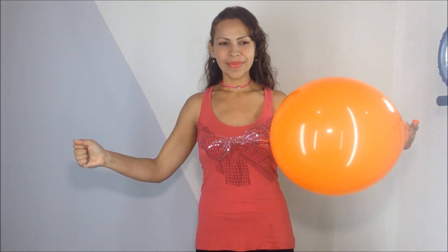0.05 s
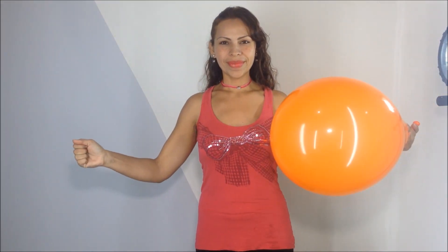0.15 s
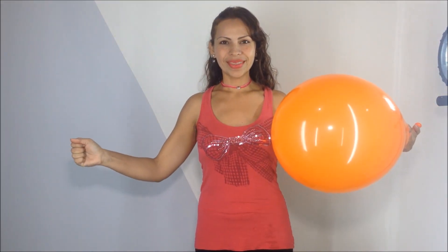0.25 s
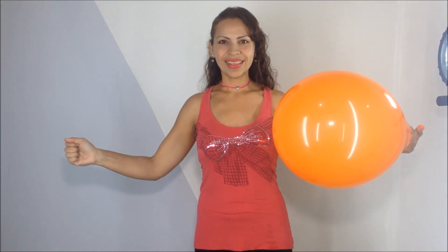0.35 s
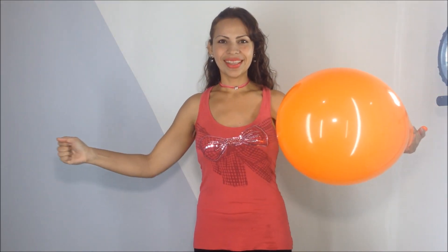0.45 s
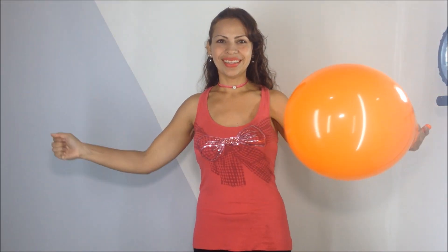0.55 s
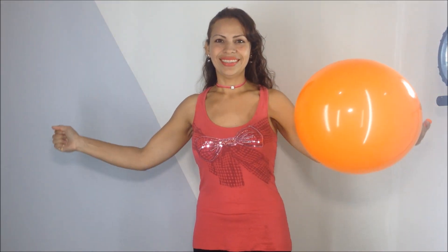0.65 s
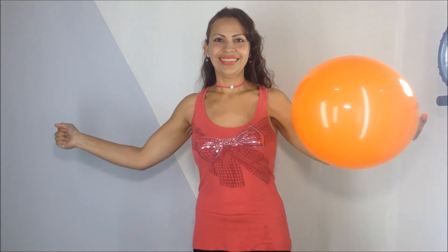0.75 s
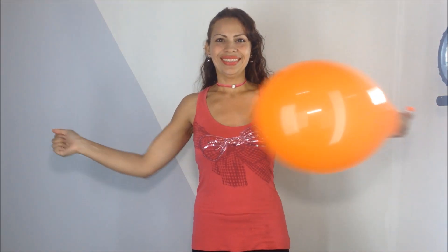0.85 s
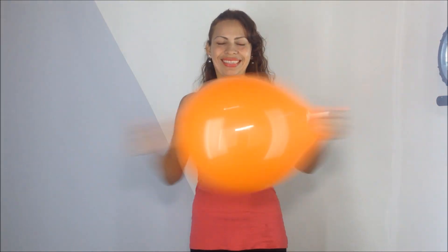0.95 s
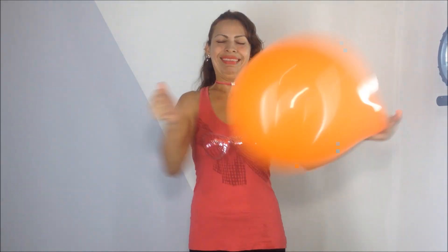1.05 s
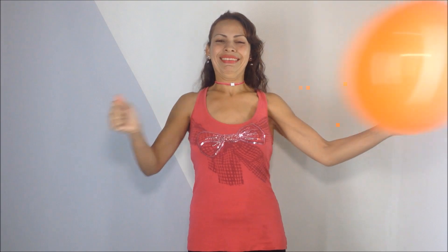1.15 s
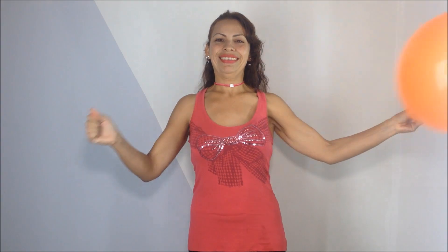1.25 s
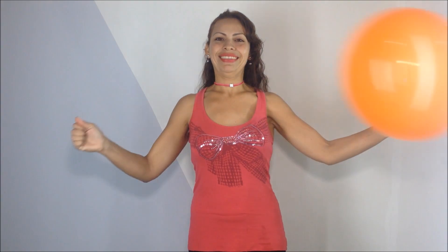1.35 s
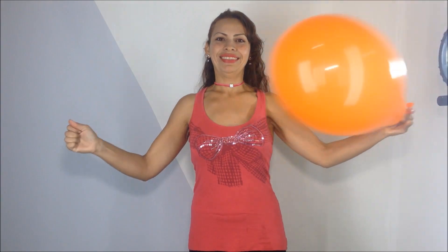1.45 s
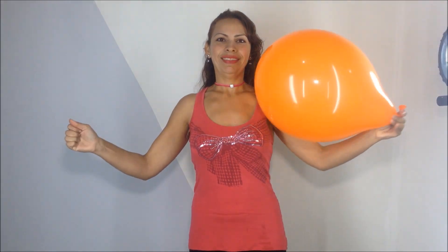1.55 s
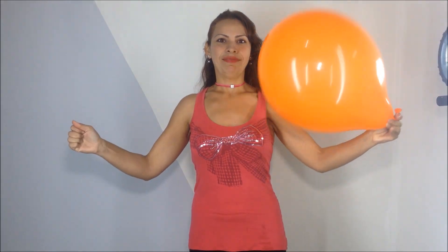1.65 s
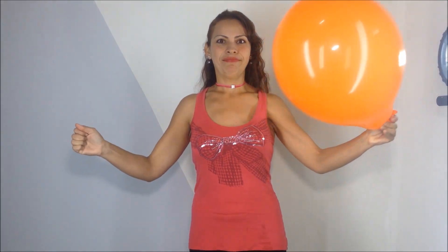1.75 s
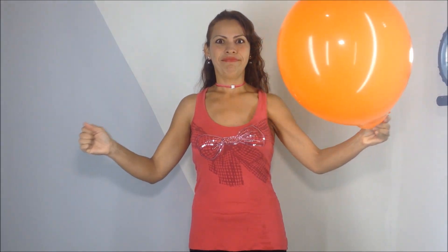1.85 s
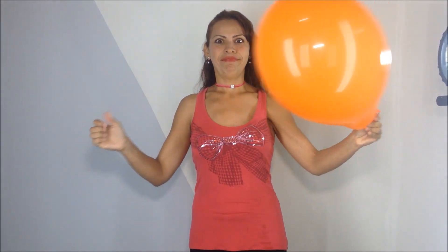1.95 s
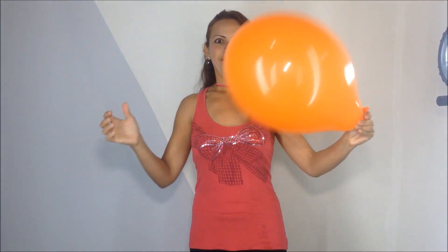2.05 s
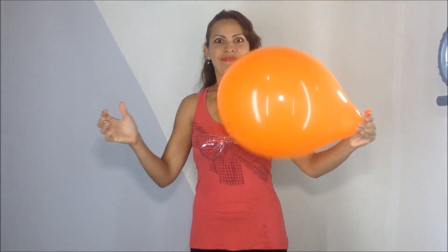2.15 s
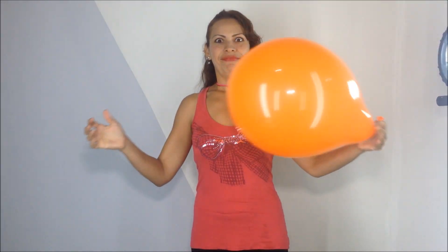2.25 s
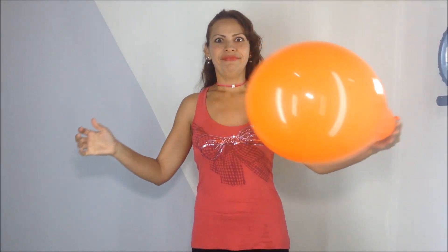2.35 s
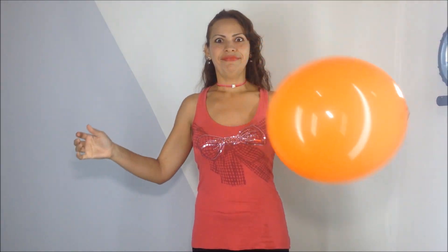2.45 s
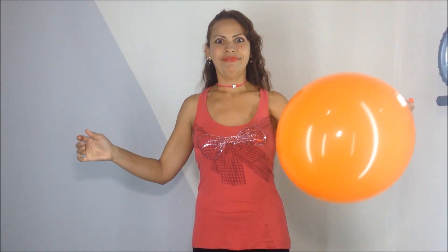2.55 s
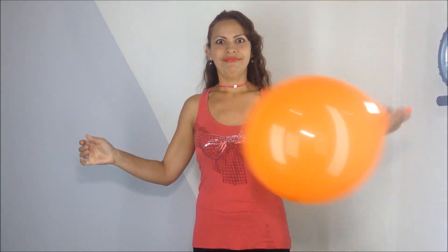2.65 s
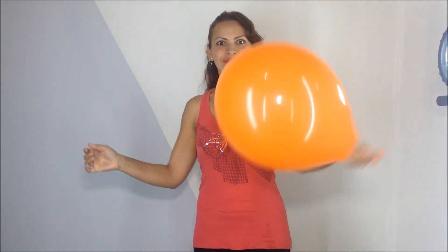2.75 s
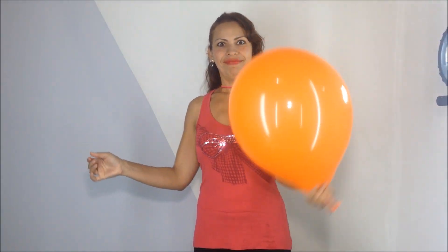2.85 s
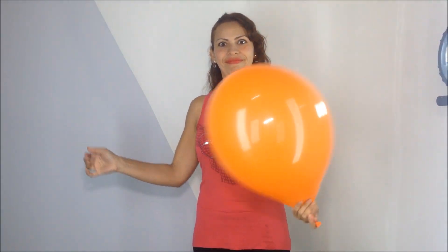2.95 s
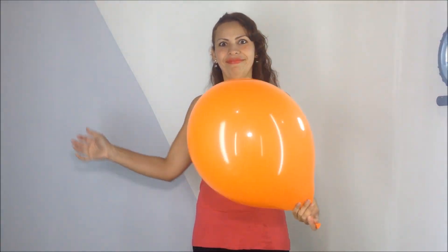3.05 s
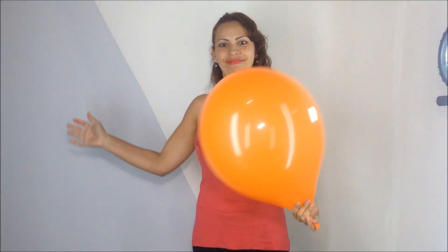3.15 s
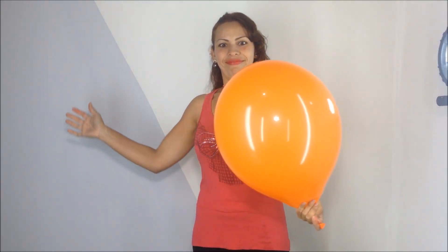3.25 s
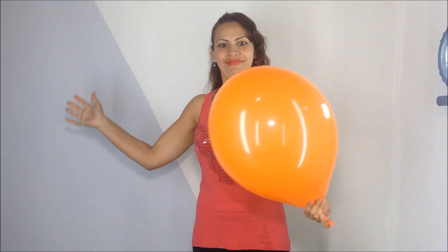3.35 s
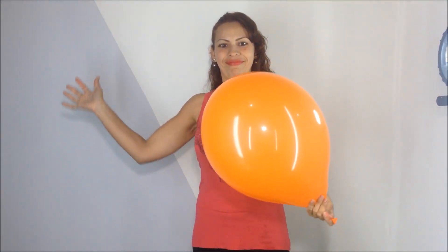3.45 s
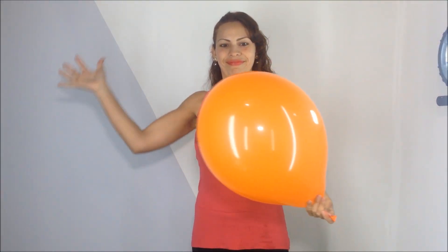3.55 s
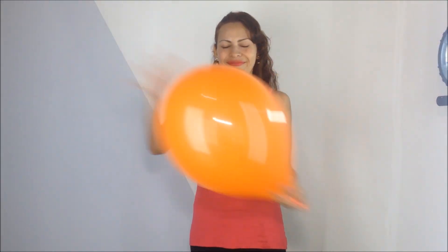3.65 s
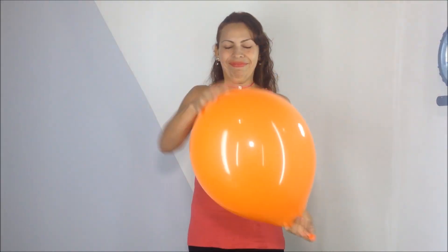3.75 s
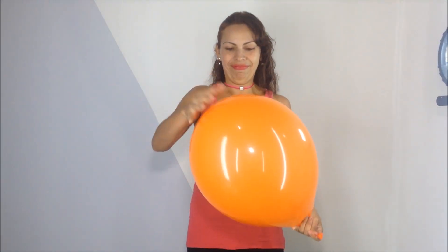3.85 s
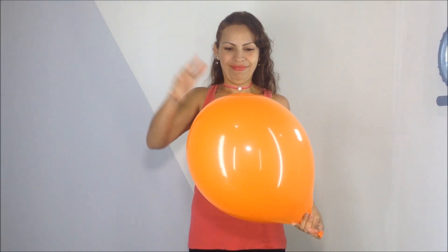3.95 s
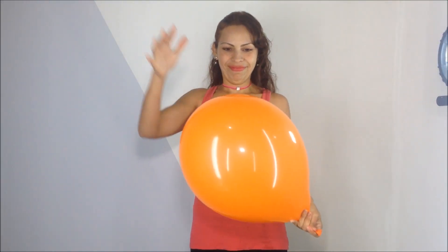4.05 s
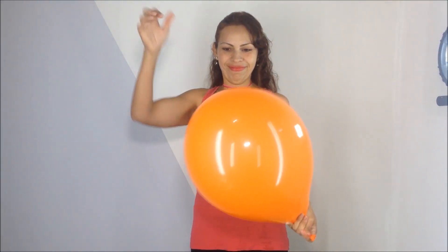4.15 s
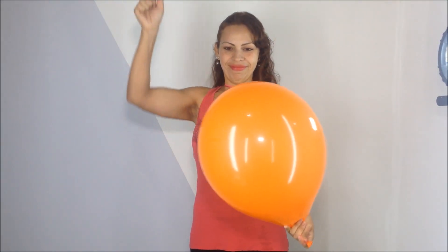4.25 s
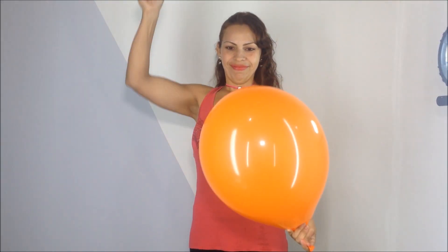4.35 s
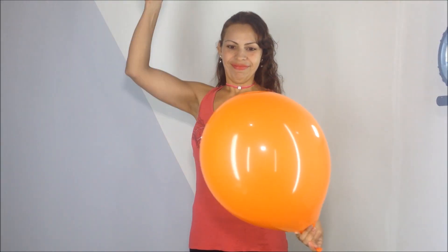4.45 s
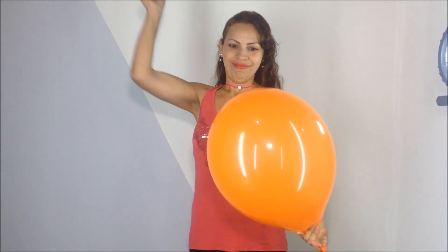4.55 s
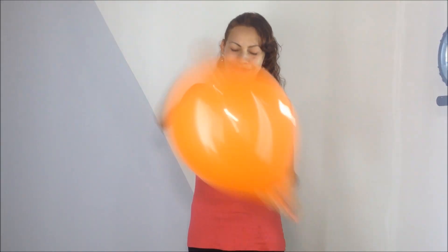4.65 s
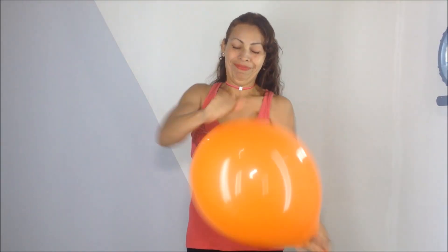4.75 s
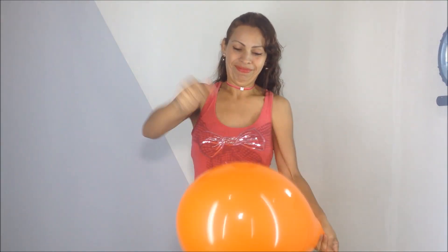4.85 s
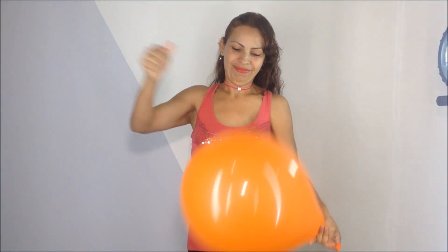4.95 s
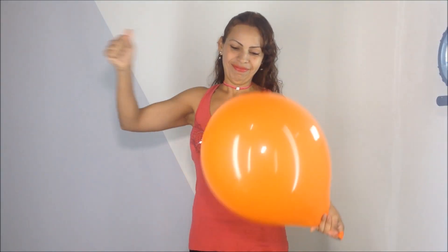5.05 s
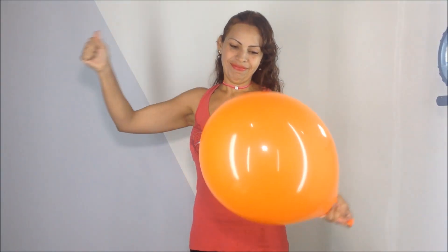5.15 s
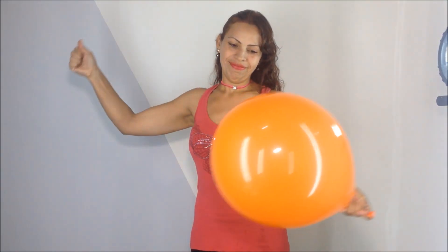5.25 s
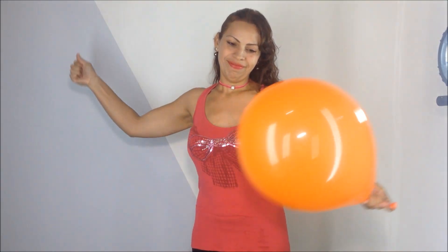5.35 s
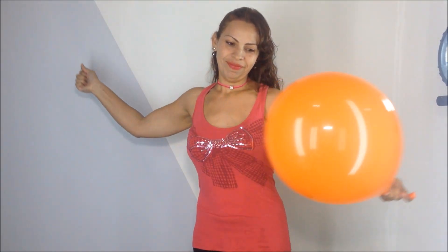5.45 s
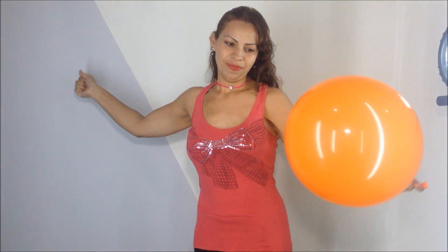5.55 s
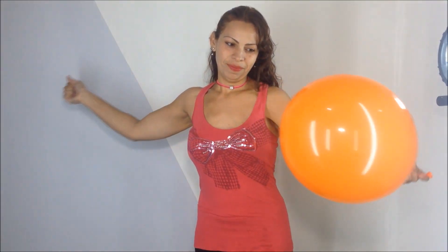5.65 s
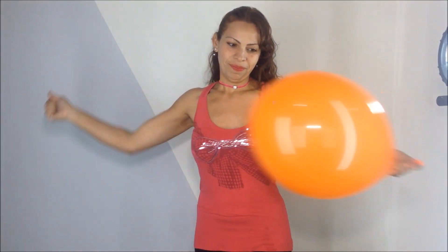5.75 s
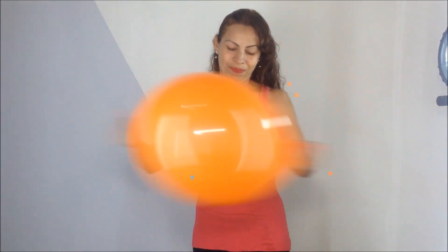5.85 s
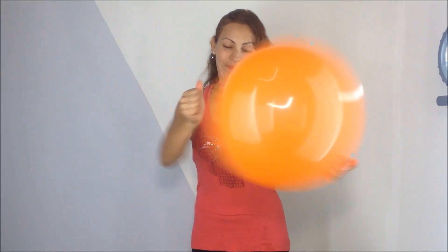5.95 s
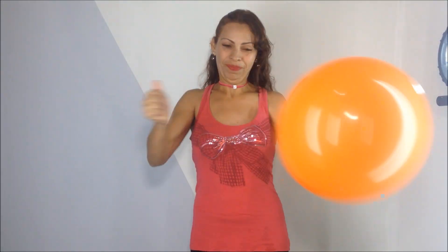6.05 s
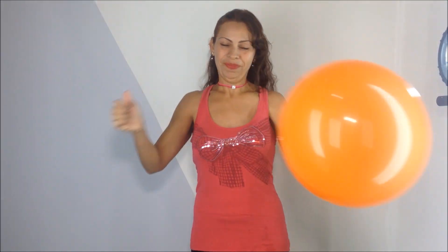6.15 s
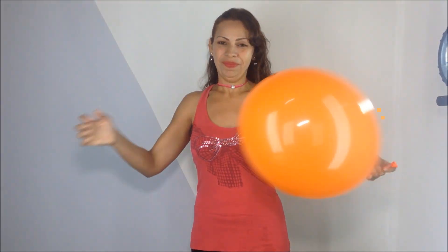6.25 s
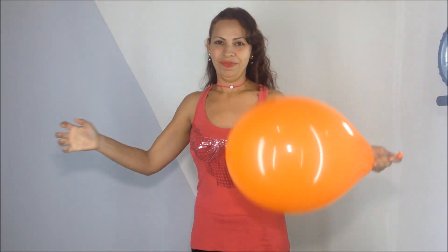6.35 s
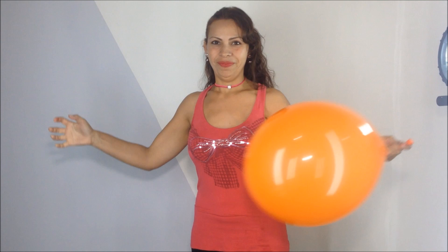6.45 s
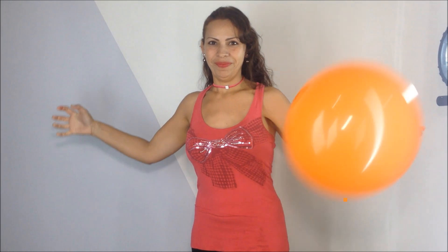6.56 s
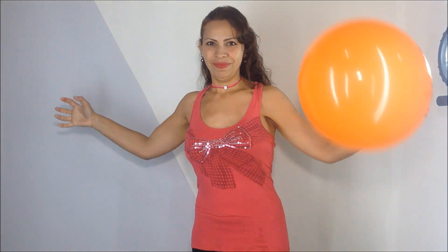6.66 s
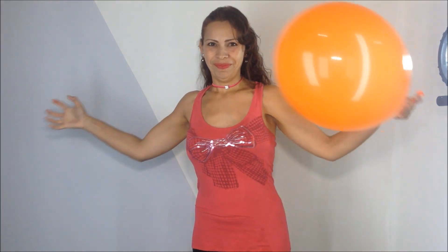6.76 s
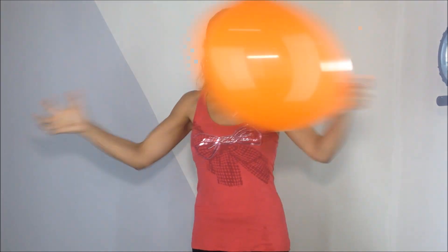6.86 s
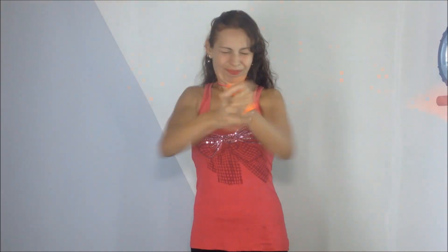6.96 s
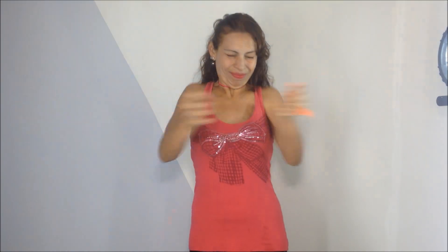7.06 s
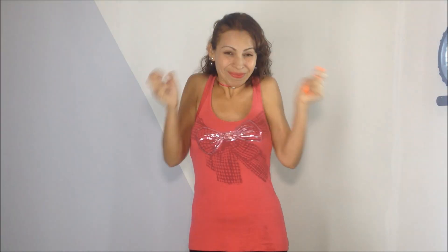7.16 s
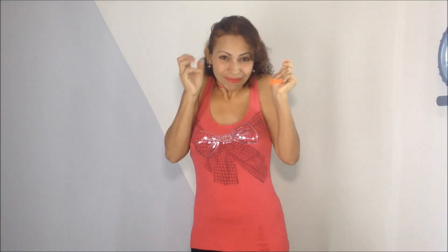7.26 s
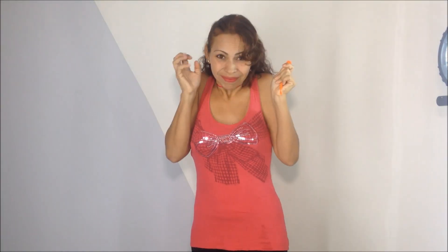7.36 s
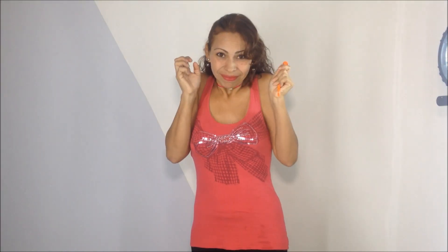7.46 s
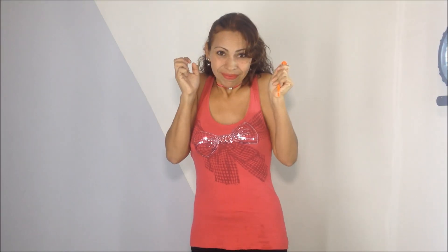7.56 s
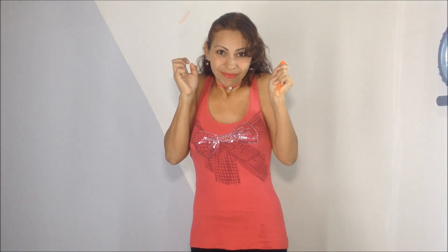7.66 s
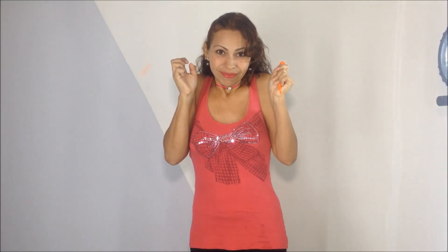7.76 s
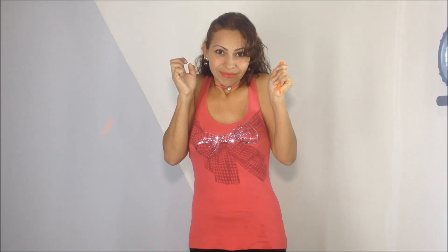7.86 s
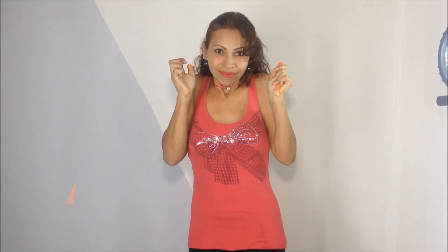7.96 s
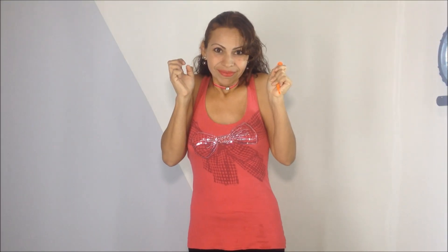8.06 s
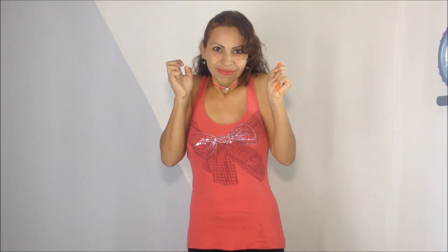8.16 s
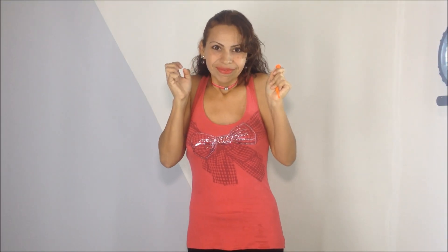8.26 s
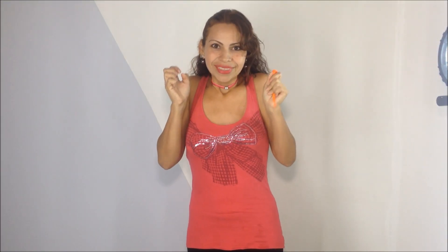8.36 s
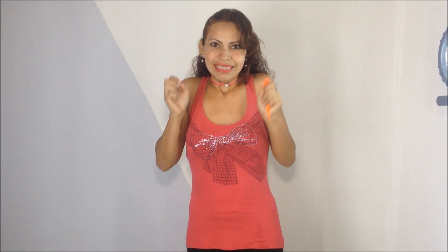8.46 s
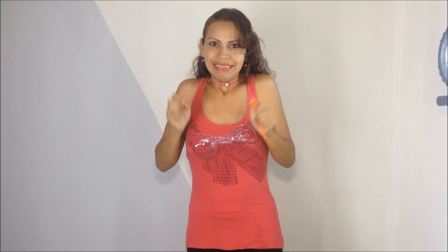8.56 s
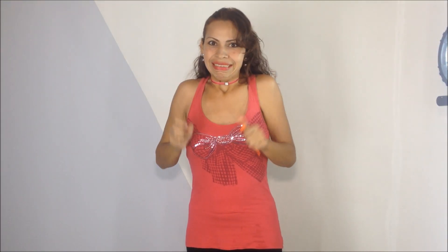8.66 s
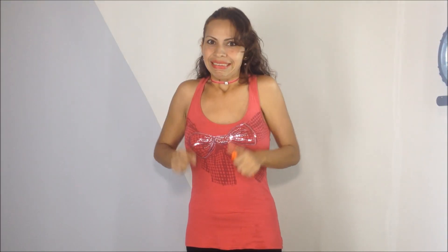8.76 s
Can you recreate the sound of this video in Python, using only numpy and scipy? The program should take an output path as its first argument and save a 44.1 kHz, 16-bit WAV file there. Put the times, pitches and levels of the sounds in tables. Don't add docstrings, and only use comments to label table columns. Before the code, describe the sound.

Faint street rumble and hiss, then a booming balloon punch echoing off bare walls. Soft strokes and ticks on taut latex follow over a distant engine. Two harder punches come about a second apart, then a softer swelling one with a loud flick. Moments later the balloon explodes, bright and crackling at first, then boomy, overloading the mono microphone. The reverberation dies away to subdued hush, light brushing and a thin high whine.

```python
import sys
import numpy as np
from scipy import signal
from scipy.fft import rfft, irfft, next_fast_len
from scipy.io import wavfile
from scipy.ndimage import uniform_filter1d

SR = 44100
rng = np.random.default_rng(int(sys.argv[2]) if len(sys.argv) > 2 else 0)


def unload_audio(sound):
    columns = np.transpose(np.atleast_2d(sound))
    steps = np.round(np.clip(columns, -1, 1) * 32767)
    wavfile.write(sys.argv[1], SR, steps.astype(np.int16))


def invert_db(level):
    return 10 ** (np.asarray(level, dtype=float) / 20)


N = 388942


def unit(x):
    return x / np.sqrt(np.mean(x ** 2) + 1e-20)


def at_hz(points, hz):
    table = np.array(points)
    return np.interp(np.log(hz), np.log(table[:, 0]), table[:, 1])


def highpass(x, order, cutoff_hz):
    return signal.sosfilt(signal.butter(order, cutoff_hz, "high", fs=SR, output="sos"), x)


def drift(rate):
    hop = 40
    pole = np.exp(-2 * np.pi * rate * hop / SR)
    noise = rng.standard_normal(N // hop + 2002)
    slow = signal.lfilter([1], [1, -2 * pole, pole * pole], noise)[2000:]
    return np.interp(np.arange(N) / hop, np.arange(len(slow)), unit(slow))


def bands(pair):
    edges_hz = 25 * 2 ** np.arange(0, 9.7, 1 / 3)
    for k, (low, high) in enumerate(zip(edges_hz, edges_hz[1:])):
        band_filter = signal.butter(2, [low, high], "band", fs=SR, output="sos")
        yield np.sqrt(low * high), signal.sosfilt(band_filter, pair[k % 2])


def add(out, start_s, x):
    i = round(start_s * SR)
    out[i:i + len(x)] += x[:N - i]


# pitch_hz [Hz], t60_s [s]
ROOM_DECAY = [(40, 0.26), (75, .7), (120, 1.29), (250, 1.165), (600, 0.84), (1500, 0.73), (2800, 0.77),
              (4500, 0.69), (8000, 0.58), (15000, .42)]


def echoes(colour, tilt_db, swell_s, lag=0.33, depth=0.67, order=1, damping=0.92, density=1200, length_s=1.6):
    run_in = SR // 20
    t = np.arange(-run_in, round(length_s * SR)) / SR
    share = np.clip((density + 1e5 * np.maximum(t, 0)) / SR, 0, 1)
    lands = rng.random((2, len(t))) < share
    clicks = rng.standard_normal((2, len(t))) * lands / np.sqrt(share)
    clicks[:, run_in] = 1.5 / np.sqrt(share[0])
    t, out = t[run_in:], 0
    for hz, band in bands(clicks):
        rise = 1 - min(depth, 1) * np.exp(-t / (abs(swell_s) * (500 / hz) ** lag))
        rise = rise ** order
        beat_db = 1.574 * np.sin(2 * np.pi * (rng.uniform(8, 30) * t + rng.random()))
        decay_db = 60 * t / at_hz(ROOM_DECAY, hz) / damping
        level_db = at_hz(colour, hz) + tilt_db * np.log2(hz / 1000) + beat_db - decay_db
        out = out + band[run_in:] * rise * invert_db(level_db)
    out = out * np.minimum(t / .0004, 1)
    return out / np.sqrt(np.mean(out[:SR // 10] ** 2))


def ringing(modes, swell_s, length_s=1.6):
    t, out = np.arange(round(length_s * SR)) / SR, 0
    for hz, level_db, t60_s in modes:
        beat = 1 + 0.44 * np.sin(2 * np.pi * (rng.uniform(3.7, 14) * t + rng.random()))
        tone = np.sin(2 * np.pi * (hz * t + rng.random()))
        out = out + invert_db(level_db - 60 * t / t60_s) * beat * tone
    return out * (1 - np.exp(-t / abs(swell_s)))


# start_s [s], level_db [dB], tilt_db [dB per octave], swell_s [s], push_db [dB]
BLOWS = [
    (1.105, -17.5, 0.4, 0.016, -32),
    (3.815, -15, 0.58, 0.01, -26.5),
    (4.8037, -15.5, 0.7, 0.023, -28.5),
    (6.008, -17.5, 0.5, 0.044, -41),
]
# pitch_hz [Hz], level_db [dB], t60_s [s]
GRIPS = [
    [(146.8, -6, 0.97), (205, -1, 1), (337, -8, 0.77), (415, -0.5, 0.27), (641, -5, 0.28),
     (683, -6.5, 0.61), (818, -27, 0.86)],
    [(136.2, -12.5, 1.6), (226, -26, 2.6), (314, -7, 0.39), (433, -15, 1.23), (508, -3, 0.5),
     (556, -9.5, 0.77), (728, -5.5, 0.48)],
    [(165.5, 0, 0.54), (217.5, -1.5, 0.58), (326.5, 1.5, 0.43), (465, -29, 0.4), (515, 1, 0.47),
     (686, -8, 0.41), (771, -1, 0.4)],
    [(208, 2, 0.3), (250, -20, 1.4), (335, 13, 0.28), (614, -32, 0.51), (710, -27, 0.6), (850, -33, 0.5)],
]
# pitch_hz [Hz], level_db [dB per Hz]
BLOW_COLOUR = [(30, -26), (53, -14), (85, -18.5), (211, 1.5), (267, -7), (320, -3), (448, -8), (497, -1.5),
               (597, -12.5), (754, -10), (1110, -10), (2100, -18), (15000, -45)]
BODY_DAMPING = [1.1, 0.84, 0.86, 0.79]
TOUCH_AHEAD = [.004, .004, .0005, .0005]


def blows():
    out = np.zeros(N)
    for blow, ahead_s, modes, damping in zip(BLOWS, TOUCH_AHEAD, GRIPS, BODY_DAMPING):
        start_s, level_db, tilt_db, swell_s, push_db = blow
        touch = echoes(BLOW_COLOUR, tilt_db + 2.0, swell_s, depth=0.27, length_s=.3)
        add(out, start_s - ahead_s, invert_db(level_db - 15) * touch)
        hit = echoes(BLOW_COLOUR, tilt_db, swell_s, damping=damping)
        add(out, start_s, invert_db(level_db) * highpass(hit, 2, 95))
        add(out, start_s, invert_db(level_db + 2) * ringing(modes, swell_s))
        push_modes = [(58.4, push_db, 0.87 * damping), (38, push_db - 17.5, .9), (78, push_db - 3, .7)]
        add(out, start_s, ringing(push_modes, 0.018))
    return out


# delay_s [s], peak_db [dB over the blow], width_ms [ms]
SLAPS = [
    (.049, 10.5, 2.5),
    (.018, 9, .9),
    (.035, 12, 1.3),
    (.042, 8.5, 2.2),
]


def fronts():
    out = np.zeros(N)
    for (start_s, level_db, *_), (delay_s, slap_db, slap_ms) in zip(BLOWS, SLAPS):
        direct = (start_s, 5, .6)
        slap = (start_s + delay_s, slap_db, slap_ms)
        for front_s, peak_db, width_ms in [direct, slap]:
            n = round(width_ms * SR / 1000)
            hump = np.sin(np.pi * np.arange(n) / n)
            rebound = np.sin(np.pi * np.arange(2 * n) / n / 2)
            add(out, front_s, invert_db(level_db + peak_db) * np.concatenate([hump, -rebound / 2]))
    return highpass(out + 1e-18, 3, 140)


# start_s [s], level_db [dB], tilt_db [dB per octave], swell_s [s]
DENT = (7.061, -16, 1.0, .003)
# start_s [s], level_db [dB], tilt_db [dB per octave], swell_s [s]
CRACK = (7.0685, 2.7, 3.02, 0.0032)
# start_s [s], level_db [dB], tilt_db [dB per octave], swell_s [s]
BURST = (7.0685, -4.5, 0.5, 0.0644)
# pitch_hz [Hz], level_db [dB per Hz]
BURST_COLOUR = [(18, -78.5), (30, -47), (75, -38), (171, -6.5), (337, -5.5), (394, -5.5), (472, -7),
                (538, -8), (1480, -20), (4540, -19), (5170, -20), (6700, -22), (15000, -33.5)]
# pitch_hz [Hz], level_db [dB], t60_s [s]
BURST_MODES = [(150.2, -9, 1.19), (183.2, -5, 1.4), (295, -5, 0.71), (382.6, -4.5, 1.37), (543, -7, 1.37),
               (708, -11.5, 0.9), (837, -9.5, 0.71), (831, -6, 0.31)]


def burst():
    out, burst_s = np.zeros(N), BURST[0]
    dent = echoes(BLOW_COLOUR, *DENT[2:], length_s=0.32)
    add(out, DENT[0], invert_db(DENT[1]) * dent)
    crack = echoes(BURST_COLOUR, *CRACK[2:], damping=.45, density=10000, length_s=.6)
    add(out, CRACK[0], invert_db(CRACK[1]) * crack)
    boom = echoes(BURST_COLOUR, *BURST[2:], lag=1.0, depth=0.87, order=2, damping=1.084,
                  density=9000, length_s=1.75)
    add(out, burst_s, invert_db(BURST[1]) * boom)
    out = highpass(out, 4, 128)
    add(out, burst_s + .05, invert_db(-12.0) * ringing(BURST_MODES, 0.11, length_s=1.8))
    lows = signal.sosfilt(signal.butter(1, 600, fs=SR, output="sos"), out)
    release_s, fade_s = .09, .015
    held = .5 - .5 * np.tanh((np.arange(N) / SR - burst_s - release_s) / fade_s)
    out = out - (1 - invert_db(-5)) * held * lows
    add(out, burst_s, ringing([(PUSH_HZ, -23, .2), (34, -27, .2)], .005))
    return out


PUSH_HZ = 58.4

# start_s [s], level_db [dB], tilt_db [dB per octave], swell_s [s]
FLICKS = [
    (1.385, -45.5, 1.5, .01),
    (2.297, -57, 3.5, 0.0041),
    (2.44, -59.5, 7, .01),
    (2.891, -56, 2.5, .004),
    (5.982, -47, 1, 0.0027),
    (6.053, -31, 3.5, 0.0023),
    (6.329, -57, 3.5, .003),
    (8.54, -63, 8, 0.032),
    (8.68, -60, 5, 0.038),
]
# pitch_hz [Hz], level_db [dB per Hz]
FLICK_COLOUR = [(300, -20), (900, -5), (1300, 1.5), (2500, -3.5), (3000, -9), (6000, -16.5), (15000, -31)]
# start_s [s], level_db [dB], tilt_db [dB per octave], swell_s [s]
NAILS = [
    (6.446, -42, -2.5, 0.0021),
    (6.97, -36.5, -0.6, .006),
]
# pitch_hz [Hz], level_db [dB per Hz]
NAIL_COLOUR = [(500, -23), (1100, -8), (1400, -3), (1800, -4), (2500, -2), (3000, -14), (5000, -20.5),
               (15000, -34.5)]
# peak_s [s], peak_db [dB], rise_s [s per 20 dB]
RUBS = [
    (1.9, -53.5, .07),
    (2.39, -43, 0.08),
    (2.696, -51, -0.08),
    (8.57, -64, 0.4),
]


def fingers():
    out, level, t = np.zeros(N), np.zeros(N), np.arange(N) / SR
    for start_s, level_db, tilt_db, swell_s in FLICKS:
        add(out, start_s, invert_db(level_db) * echoes(FLICK_COLOUR, tilt_db, swell_s, length_s=0.55))
    for start_s, level_db, tilt_db, swell_s in NAILS:
        nail = echoes(NAIL_COLOUR, tilt_db, swell_s, depth=0.44, density=500, length_s=0.48)
        add(out, start_s, invert_db(level_db) * nail)
    for peak_s, peak_db, rise_s in RUBS:
        fall_s = rise_s * 2.25
        level += invert_db(peak_db - 20 * np.maximum((peak_s - t) / rise_s, (t - peak_s) / fall_s))
    sizes = invert_db(3.2 * np.minimum(rng.exponential(1, (2, N)), 5))
    signs = rng.choice([-1, 1], (2, N))
    slips = sizes * signs * (rng.random((2, N)) < 4000 / SR)
    rub = 0
    for hz, band in bands(slips):
        if hz > 300:
            rub = rub + band * invert_db(at_hz(FLICK_COLOUR, hz) - 2.0 * np.log2(hz / 1000))
    return out + level * unit(rub)


# time_s [s], firing_hz [Hz], second_order_db [dB]
ENGINE = [
    [(1.55, 76.4, -55), (1.68, 80.7, -42.5), (1.92, 80.8, -49.5), (2.1, 87.5, -42.5), (2.45, 93, -46.5),
     (2.8, 94.1, -45), (3.0, 87, -46), (3.09, 75.9, -45), (3.3, 72, -55)],
    [(5.1, 77.3, -44), (5.3, 76.8, -40), (5.6, 78.1, -42.5), (6.7, 80, -45), (7.0, 79.8, -54)],
]
# third_db [dB over second], third_change_db [dB per s], fifth_db [dB over second]
UPPER_ORDERS = [
    (5, -17, -18),
    (-14, 0, -14),
]


def engine():
    out = np.zeros(N)
    for rows, (third_db, change_db, fifth_db) in zip(ENGINE, UPPER_ORDERS):
        time_s, firing_hz, level_db = np.transpose(rows)
        t = np.arange(round(time_s[0] * SR), round(time_s[-1] * SR)) / SR
        hz = np.interp(t, time_s, firing_hz) * (1 + .004 * drift(6)[:len(t)])
        phase = 2 * np.pi * np.cumsum(hz) / SR
        tone = np.sin(2 * phase)
        tone = tone + invert_db(third_db + change_db * (t - time_s[0])) * np.sin(3 * phase)
        tone = tone + invert_db(fifth_db) * np.sin(5 * phase)
        level = np.sqrt(2) * invert_db(np.interp(t, time_s, level_db))
        add(out, time_s[0], level * tone * signal.windows.tukey(len(t), .1))
    return out * invert_db(1 + 1.5 * drift(9))


# pitch_hz [Hz], level_db [dB per Hz]
STREET = [(15, -72), (25, -48.5), (49, -23), (86, -39), (98, -25), (121, -1.5), (243, -1.5), (278, -2),
          (363, -6.5), (404, -6.5), (637, -8), (879, -13), (978, -17), (4750, -31), (15000, -47.5)]


def street():
    together, noise = drift(0.55), 0
    for hz, band in bands(rng.standard_normal((2, N))):
        noise = noise + band * invert_db(at_hz(STREET, hz) + .7 * together + 1.2 * drift(4.2))
    since_s = np.arange(N) / SR - BURST[0]
    duck_db = np.minimum(-5 + 2.5 * np.maximum(since_s - 1, 0), 0) * (since_s > 0)
    return unit(noise) * invert_db(-44.5 + duck_db)


# start_s [s], pitch_hz [Hz], level_db [dB]
WHINE = (8.62, 7806, -74)


def whine():
    start_s, hz, level_db = WHINE
    t = np.arange(N) / SR
    fade_in = np.clip((t - start_s) / .08, 0, 1)
    return invert_db(level_db + 2.5 * drift(15)) * fade_in * np.sin(2 * np.pi * hz * t)


# pitch_hz [Hz], width_hz [Hz], lift_db [dB]
STANDING = [(199, 11, 2.5), (278, 12, 3), (399, 12, 5), (507, 10, 0), (657, 36, 5), (777, 12, 1.5),
            (860, 44, 3), (1168, 47, 3.5), (1377, 45, 2.5)]


def standing(x):
    size = next_fast_len(N)
    hz = np.fft.rfftfreq(size, 1 / SR)
    lift = 1
    for centre_hz, width_hz, lift_db in STANDING:
        lift = lift + (invert_db(lift_db) - 1) / (1 + 2j * (hz - centre_hz) / width_hz)
    return irfft(rfft(x, size) * lift, size)[:N]


def scene():
    in_room = standing(blows() + burst() + fingers() + street())
    return (in_room + fronts() + engine() + whine())[None]


DROPOUTS = [.277, .747, 1.078, 1.302, 1.876, 3.158, 3.328, 3.435, 3.521, 3.606, 3.969, 4.033, 4.566, 4.759,
            5.333, 5.377, 5.525, 5.718, 5.783, 6.034, 6.146, 6.21, 6.274, 6.359, 6.529, 6.997, 7.191, 7.277,
            7.554, 8.705]


def thin_out(x):
    hop = round(1024 * SR / 48000)
    n, k = np.arange(2 * hop)[:, None] + .5, np.arange(hop) + .5
    window = np.sqrt(2 / hop) * np.sin(np.pi * n / 2 / hop)
    basis = window * np.cos(np.pi / hop * (n + hop / 2) * k)
    frames = (np.array(DROPOUTS)[:, None] * SR).astype(int) - hop + np.arange(2 * hop)
    lines = x[frames] @ basis
    luck = invert_db(rng.normal(0, 3.9, (len(DROPOUTS), hop // 16 + 1)))
    weight = np.abs(lines) * (k + 30) ** .6 * np.repeat(luck, 16, axis=1)[:, :hop]
    kept_share, kept_below_hz = .085, 1200
    weak = weight < np.quantile(weight, 1 - kept_share, axis=1, keepdims=True)
    lost = lines * weak * (k * SR / 2 / hop > kept_below_hz)
    out = x.copy()
    np.subtract.at(out, frames, lost @ basis.T)
    return out


def roll_off(x):
    return signal.sosfilt(signal.butter(12, 15970, fs=SR, output="sos"), x)


# pitch_hz [Hz], level_db [dB]
MICROPHONE = [(2500, -0.94), (3800, 0), (4650, 2.5), (5050, -2), (8300, -0.5), (9000, -2.5), (15000, 1),
              (15350, 1), (15550, -38.5)]


def record(dry):
    limit_db, release_db_s, clip = -5, 149, 1.1
    t, size = np.arange(N) / SR, next_fast_len(N)
    level_db = 10 * np.log10(uniform_filter1d(dry ** 2, size=220) + 1e-12)
    held_db = np.maximum.accumulate(level_db + release_db_s * t, axis=-1) - release_db_s * t
    x = dry * invert_db(-uniform_filter1d(np.maximum(held_db - limit_db, 0), size=90))
    x = x / (1 + (x / clip) ** 4) ** .25
    hz = np.fft.rfftfreq(size, 1 / SR)
    x = irfft(rfft(x, size) * invert_db(at_hz(MICROPHONE, hz + 1)), size)[:, :N]
    mix = thin_out(x[0])[None]
    return roll_off(mix)


dry = scene()
out = record(dry)
unload_audio(out)
```